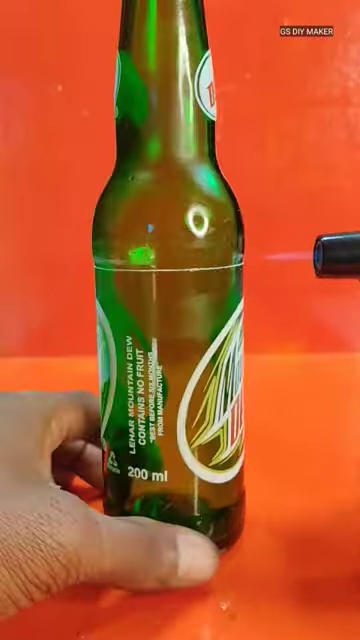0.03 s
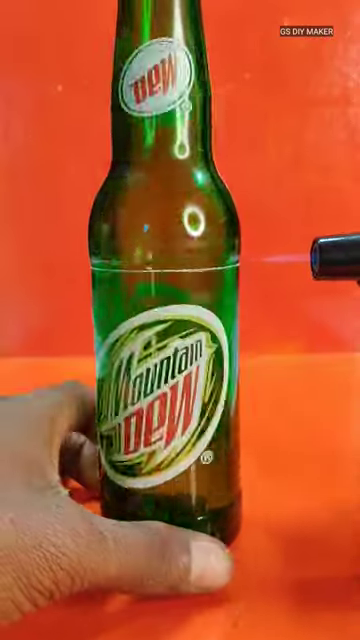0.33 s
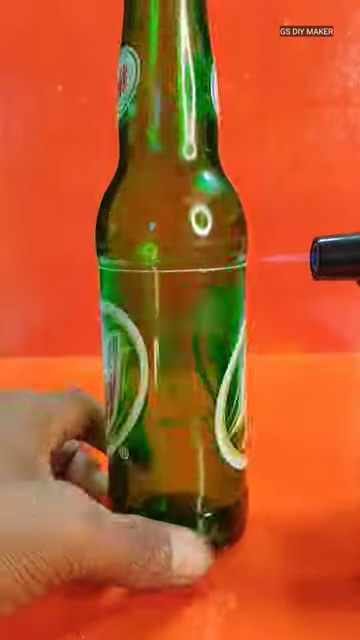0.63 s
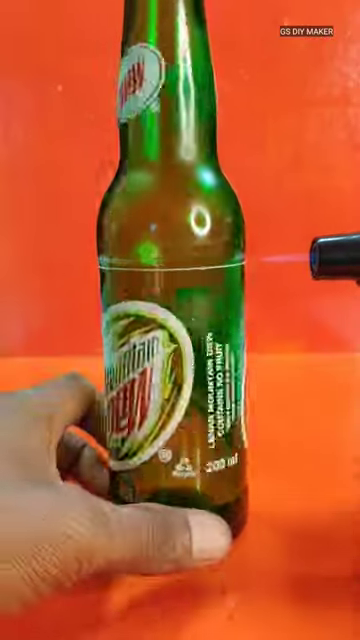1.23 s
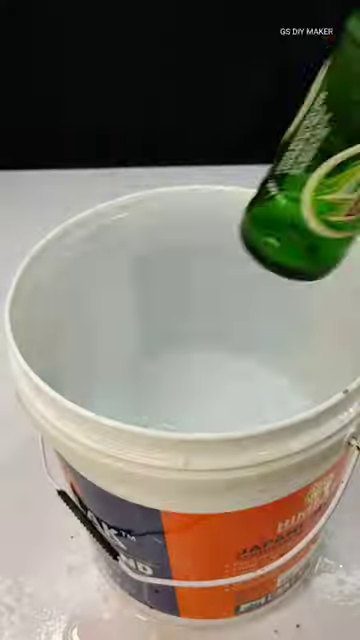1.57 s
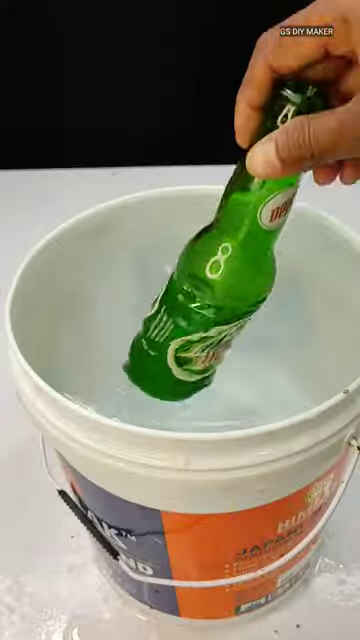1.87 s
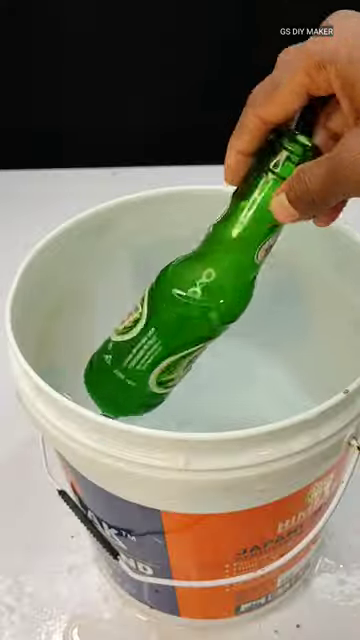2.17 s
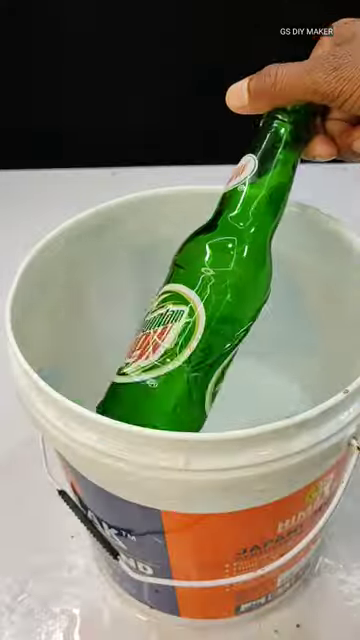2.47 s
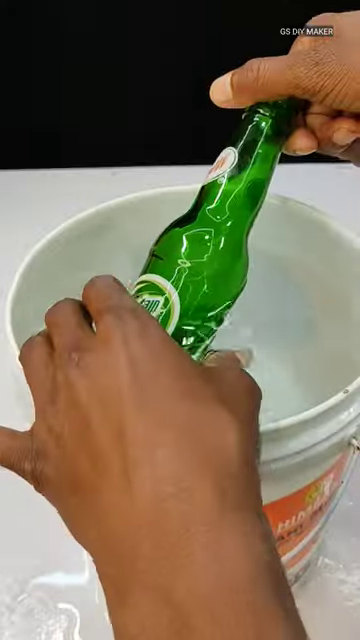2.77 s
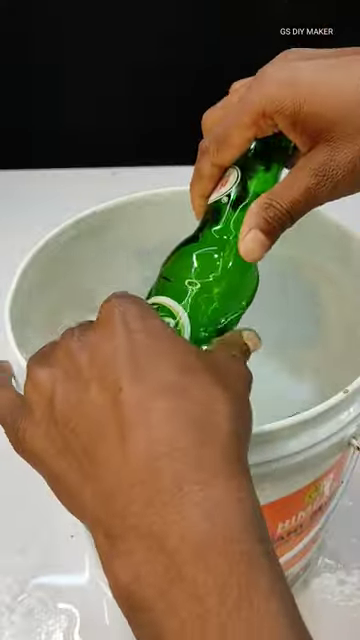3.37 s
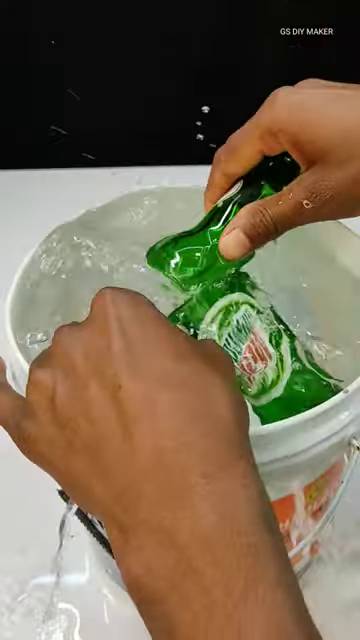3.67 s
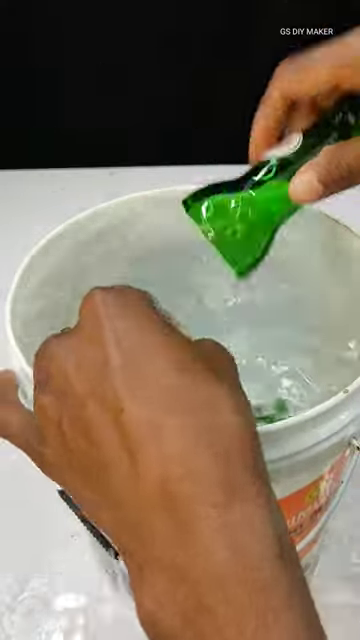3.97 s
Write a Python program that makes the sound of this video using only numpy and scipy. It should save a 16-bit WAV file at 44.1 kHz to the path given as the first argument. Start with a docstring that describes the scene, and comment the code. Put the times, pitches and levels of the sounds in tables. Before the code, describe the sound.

A glass bottle cracks sharply and splashes in a plastic bucket of water. Before that, a gas torch hisses softly and stops, and the hot glass faintly sizzles. Afterward a loose piece knocks on the bucket, heard close.

```python
"""A gas torch hisses and surges against a turning glass bottle, then dies away.
Dipped in a plastic bucket of water, the hot bottle sings briefly over a swelling hiss.
The glass squeaks and snaps, each crack ringing its modes; water splashes and bubbles.
The loose half sinks and knocks on the bucket. A low room rumble lies under the dip."""
import sys
import numpy as np
from scipy import signal
from scipy.fft import rfft, irfft
from scipy.io import wavfile
from scipy.ndimage import uniform_filter1d

SR = 44100
rng = np.random.default_rng(int(sys.argv[2]) if len(sys.argv) > 2 else 0)


def put_to_file(sound):
    """Save the sound as 16-bit audio at rate SR, in the file named by the first command-line argument."""
    columns = np.atleast_2d(sound).T  # one column per channel
    safe = np.clip(columns, -1, 1)
    whole_steps = np.round(safe * 32767)
    wavfile.write(sys.argv[1], SR, whole_steps.astype(np.int16))


N = 176400
TORCH_OFF_S = 1.515
COHERENT_HZ = 1350  # left and right alike below this
CRACK_RISE_S, RING_SCATTER_DB = 0.00047, 3.5
THUD_RISE_S, THUD_T60_S = 0.0033, 0.084
# thud and slosh spectrum: freq_hz, level_db
THUD_SPECTRUM = [(90, -13), (200, 0), (950, -3), (1200, -9.5), (2300, -10), (15000, -32.5)]


def undb(db):
    """Decibels to gain."""
    return 10 ** (np.asarray(db) / 20)


def clock():
    """Sample times, s."""
    return np.arange(N) / SR


def freqs():
    """Bin frequencies, Hz."""
    return np.maximum(np.arange(N // 2 + 1) * SR / N, 1)


def gains(points):
    """Gain per bin from (freq_hz, level_db) points."""
    hz, db = np.array(points, float).T
    return undb(np.interp(np.log(freqs()), np.log(hz), db))


def noise(gain, source=None):
    """Coloured stereo noise, coherent in the bass, mid rms 1."""
    spectra = rfft(rng.standard_normal((3, N)) if source is None else source)
    common = 1 / (1 + (freqs() / COHERENT_HZ) ** 2)
    out = irfft(gain * (np.sqrt(common) * spectra[2] + np.sqrt(1 - common) * spectra[:2]), N)
    return out / np.std(out.mean(0))


def walk(rate_hz):
    """Smooth random wander, unit spread."""
    step = int(SR / rate_hz)
    wander = uniform_filter1d(np.repeat(rng.standard_normal(N // step + 1), step), step)[:N]
    return wander / wander.std()


def burst(start_s, rise_s, t60_s):
    """Linear rise, exponential decay."""
    age = clock() - start_s
    return np.clip(age / rise_s, 0, 1) * np.exp(-np.log(1000) * np.maximum(age - rise_s, 0) / t60_s)


def ring(modes, start_s, rise_s):
    """Decaying modes; left-right phase gap grows with pitch."""
    out, first = np.zeros((2, N)), int(start_s * SR)
    age = np.arange(min(N - first, SR // 2)) / SR
    for hz, db, t60_s in modes:
        skew = min(hz / COHERENT_HZ / 2, 1) * np.array([[1], [-1]]) * np.pi / 4
        phase = rng.uniform(0, 2 * np.pi) + rng.choice([-1, 1]) * skew
        envelope = undb(db) * burst(0, rise_s, t60_s)[:len(age)]
        out[:, first:first + len(age)] += envelope * np.sin(2 * np.pi * hz * age + phase)
    return out


def torch():
    """Gas jet and flame; uneven surges lift both, and the roar dies last."""
    # flame surges: centre_s
    surges = [.06, 0.137, 0.23, 0.299, 0.36, 0.43, 0.491, 0.588, 0.658, 0.734, .815, .885, .955, 1.04,
              1.113, 1.185, 1.268, 1.329, 1.399, 1.456]
    # flame spectrum: freq_hz, level_db
    roar_spectrum = [(450, -10.5), (550, 3.5), (680, -7), (830, 2), (1020, -4), (1500, -1.5), (2450, -16.5),
                     (3100, -4.5), (3900, -18)]
    # gas jet spectrum: freq_hz, level_db
    jet_spectrum = [(30, -2), (100, -9.5), (200, -3), (340, -12), (3000, -7), (6300, -5), (8200, -11),
                    (9150, -3), (9800, -6.5), (14500, -10.5)]
    length_s, edge_s, tail_s, shutoff_s = 0.045, 0.01, 0.027, 0.0099
    jet_db, idle_db, surge_db = -53.5, -64.5, -52.5
    scatter_db, sag_db, flicker_db, lift_db = 1.5, 2.5, 2, 0.5
    t = clock()
    surge = np.zeros(N)
    for centre_s in surges:
        gate = np.clip(0.5 + (length_s / 2 - abs(t - centre_s)) / edge_s, 0, 1)
        progress = np.clip((t - centre_s) / length_s, -1, 1)
        surge += gate * undb(scatter_db * rng.standard_normal() - sag_db * progress)
    roar = (undb(idle_db) + surge * undb(surge_db)) * np.exp(-np.maximum(t - TORCH_OFF_S, 0) / tail_s)
    flame = roar * undb(flicker_db * walk(150)) * noise(gains(roar_spectrum))
    jet = undb(jet_db + lift_db * surge) * noise(gains(jet_spectrum))
    return flame + jet * np.clip((TORCH_OFF_S - t) / shutoff_s, 0, 1)


def singing():
    """Hot glass meets water and sings in quick bursts."""
    # bursts: start_s
    starts = [1.893, 1.91, 1.958, 2.01]
    # resonances: pitch_hz, width_hz, level_db
    tones = [(693, 120, 1), (3924, 84, -9)]
    peaks = sum(undb(db) / np.sqrt(width_hz) / (1 + (2 * (freqs() - hz) / width_hz) ** 2)
                for hz, width_hz, db in tones)
    return undb(-57) * noise(peaks) * sum(burst(s, rise_s=0.012, t60_s=0.14) for s in starts)


def squeak():
    """The crack faces squeak: a fluttering, falling tone."""
    start_s, length_s, edge_s = 3.486, 0.011, 0.0014
    pitch_hz, sag_hz_per_s, flutter_hz = 10580, 110000, 300
    age = clock() - start_s
    gate = np.clip(np.minimum(age, length_s - age) / edge_s, 0, 1)
    flutter = 1 + 0.69 * np.sin(2 * np.pi * flutter_hz * age)
    phase = 2 * np.pi * (pitch_hz * age - sag_hz_per_s * age ** 2 / 2)
    return undb(-28.5) * gate * flutter * np.sin(phase + np.array([[0], [2.1]]))


def cracks():
    """Each fracture snaps and rings the bottle's modes in a new mix."""
    # fractures: start_s, level_db
    fractures = [(2.231, -47.5), (3.5425, -15.5), (3.6107, -29.5), (3.666, -34.5), (3.6772, -37.5),
                 (3.702, -38.5), (3.7365, -43)]
    # snap spectrum: freq_hz, level_db
    snap_spectrum = [(200, -14), (650, 6.5), (1150, -12.5), (2000, 6.5), (2900, -8.5), (6000, -5),
                     (6700, 3.5), (7700, -22), (9350, 5.5), (10400, -12), (12400, -9), (13300, 7),
                     (14200, -2.5)]
    # bottle modes: pitch_hz, level_db
    bottle_modes = [(1575, -3.5), (1863, -5), (2029, -6), (6573, 0), (6810, -1), (9269, -2), (9420, 1),
                    (13327, 9.5), (15040, -8)]
    snap_t60_s, ring_t60_s = 0.031, 0.074
    envelope = sum(undb(db) * burst(s, CRACK_RISE_S, snap_t60_s) for s, db in fractures)
    out = undb(-1.5) * noise(gains(snap_spectrum)) * envelope
    for start_s, level_db in fractures:
        modes = [(hz, db + RING_SCATTER_DB * rng.standard_normal(), ring_t60_s)
                 for hz, db in bottle_modes]
        out += undb(level_db - 17) * ring(modes, start_s, CRACK_RISE_S)
    return out


def shards(count=18, t60_s=0.022):
    """Splinters tinkle at random pitches after the break."""
    out = np.zeros((2, N))
    for _ in range(count):
        pitch_hz = rng.uniform(6050, 15030)
        level_db = -43 + RING_SCATTER_DB * rng.uniform(-1, 1)
        start_s = rng.uniform(3.55, 3.76)
        out += ring([(pitch_hz, level_db, t60_s)], start_s, CRACK_RISE_S)
    return out


def water():
    """Clumped sprays of tiny drops over a low slosh."""
    # splashes: start_s, level_db, t60_s
    splashes = [(1.885, -58, 0.092), (2.323, -56, .072), (2.948, -56, 0.089), (3.48, -41, 0.074),
                (3.522, -36.5, 0.13), (3.62, -44.5, 0.37), (3.665, -43, 0.14), (3.737, -48, 0.12),
                (3.785, -43, 0.086)]
    # spray spectrum: freq_hz, level_db
    spray_spectrum = [(500, -12.5), (1100, -14.5), (8000, -17.5), (14000, -12.5)]
    drops_per_s, spread_db, clump_db, rise_s = 3000, 3.5, 3, 0.0095
    drops = (rng.random((3, N)) < drops_per_s / SR) * rng.standard_normal((3, N))
    drops *= undb(spread_db * rng.standard_normal((3, N)))
    spray = noise(gains(spray_spectrum), drops) * undb(clump_db * walk(220))
    envelope = sum(undb(db) * burst(s, rise_s, t60_s) for s, db, t60_s in splashes)
    slosh = undb(-49) * noise(gains(THUD_SPECTRUM)) * burst(3.48, rise_s=0.042, t60_s=1)
    return spray * envelope + slosh


def bubbles():
    """Air pockets ring; the small ones glide up."""
    # air pockets: start_s, pitch_hz, level_db, t60_s
    pockets = [(3.174, 1470, -59, 0.098), (3.484, 531, -33.5, 0.022), (3.506, 315, -42.5, 0.096),
               (3.658, 580, -27.5, 0.021), (3.686, 3110, -41.5, 0.025), (3.711, 357, -32, 0.04),
               (3.951, 1810, -43.5, 0.026)]
    rise_s, glide_octaves, small_above_hz = 0.0025, 0.33, 1000
    t = clock()
    out = np.zeros(N)
    for start_s, hz, db, t60_s in pockets:
        octaves = glide_octaves * (hz > small_above_hz) * np.clip((t - start_s) / t60_s, 0, 1)
        phase = 2 * np.pi * np.cumsum(hz * 2 ** octaves * (t > start_s)) / SR
        out += undb(db) * burst(start_s, rise_s, t60_s) * np.sin(phase)
    return out


def sinking():
    """The loose half rings dully under water, then knocks on the bucket floor."""
    # submerged glass modes: pitch_hz, level_db, t60_s
    sunken_modes = [(475, 1, 0.13), (731, 2, 0.081)]
    # bucket modes: pitch_hz, level_db, t60_s
    bucket_modes = [(147.8, -12, 0.53), (239.3, 1, 0.15), (299, -4.5, 0.19), (380, -8.5, .1),
                    (560, -6.5, 0.11), (935, -1, 0.039)]
    knock_s, lead_s = 3.888, 0.0027
    thud = undb(-28) * noise(gains(THUD_SPECTRUM)) * burst(knock_s - lead_s, THUD_RISE_S, THUD_T60_S)
    glass = undb(-39) * ring(sunken_modes, start_s=3.801, rise_s=0.011)
    bucket = undb(-30) * ring(bucket_modes, knock_s, rise_s=0.01)
    return thud + glass + bucket


def bumps():
    """The bottle bumps softly in the bucket."""
    # contacts: start_s, level_db
    contacts = [(2.411, -59), (3.175, -57)]
    envelope = sum(undb(db) * burst(s, THUD_RISE_S, THUD_T60_S) for s, db in contacts)
    return noise(gains(THUD_SPECTRUM)) * envelope


def hiss():
    """The torch's last hiss fades out; then a hiss in the bucket swells, flickers and brightens."""
    # hiss spectrum: freq_hz, level_db
    spectrum = [(200, -0.5), (400, -6.5), (2000, -11), (14000, -8)]
    # torch tail, then bucket hiss: time_s, level_db
    contour = [(1.56, -73.5), (1.617, -96), (1.7, -83), (1.85, -71.5), (1.9, -62), (2.12, -65.5),
               (2.3, -62.5), (2.42, -57.5), (2.49, -59), (2.6, -72), (2.8, -68), (2.854, -55),
               (2.92, -64.5), (3.12, -59.5), (3.47, -61), (3.85, -69.5)]
    split_hz, tilt_db_per_s, flicker_db = 9000, 2, 2
    t = clock()
    time_s, level_db = np.array(contour).T
    full = noise(gains(spectrum))
    lows = irfft(rfft(full) / (1 + (freqs() / split_hz) ** 4), N)
    tilt = undb(tilt_db_per_s * (t - time_s.mean()) / 2)
    envelope = (t > TORCH_OFF_S) * undb(np.interp(t, time_s, level_db) + flicker_db * walk(110))
    return envelope * (lows / tilt + (full - lows) * tilt)


def room(start_s=1.606, fade_s=0.091):
    """Low rumble, fading in after the torch."""
    # rumble spectrum before the low-pass: freq_hz, level_db
    spectrum = [(30, 0), (110, 0), (300, -16.5)]
    rumble = noise(gains(spectrum) / (1 + (freqs() / COHERENT_HZ) ** 2))
    return undb(-65) * np.clip((clock() - start_s) / fade_s, 0, 1) * rumble


def scene():
    """Torch, then the bucket events with a short echo, over rumble and hiss."""
    events = singing() + bumps() + squeak() + cracks() + shards() + water() + bubbles() + sinking()
    tail = rng.standard_normal((2, N)) * burst(0, rise_s=0.0093, t60_s=0.21)
    echo = signal.fftconvolve(events, tail / np.sqrt(np.sum(tail[0] ** 2)), axes=1)[:, :N]
    return torch() + events + undb(-13.5) * echo + room() + hiss()


def record(dry):
    """The left microphone takes more of the lows; the top is cut."""
    # stereo balance: freq_hz, left_minus_right_db
    balance = [(30, 10), (600, 10.5), (4500, 3), (14000, 0)]
    cutoff_hz = 15700
    ratio = gains(balance)
    sides = np.stack([ratio, np.ones_like(ratio)]) * 2 / (1 + ratio)
    taps = np.roll(irfft(sides, N), 256, axis=1)[:, :513] * np.hanning(513)
    heard = signal.fftconvolve(dry, taps, mode="same", axes=1)
    return signal.sosfilt(signal.ellip(10, 0.2, 70, cutoff_hz, fs=SR, output="sos"), heard)


dry = scene()
out = record(dry)
put_to_file(out)
```